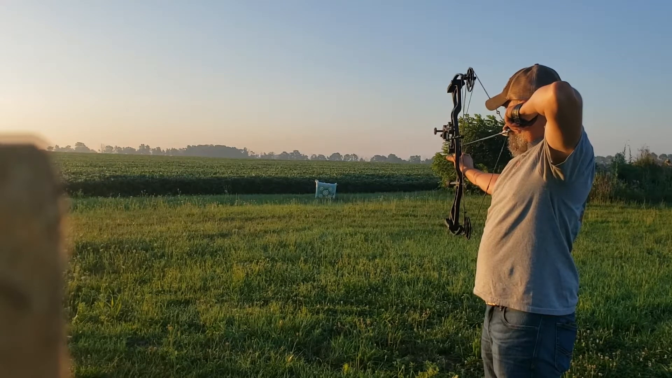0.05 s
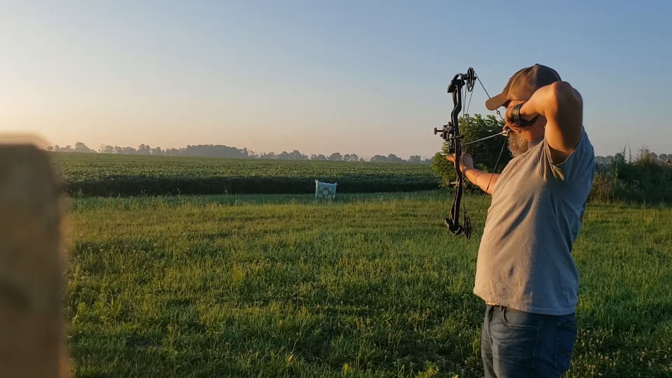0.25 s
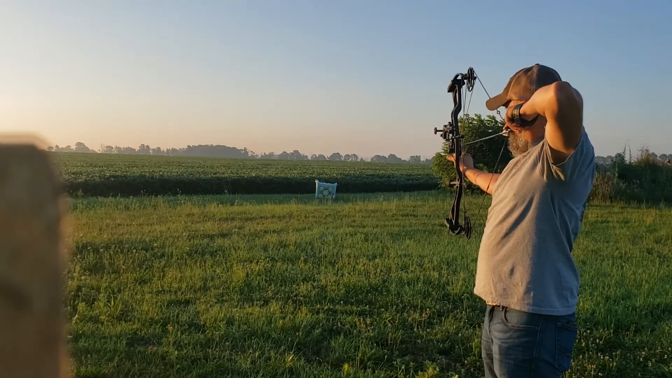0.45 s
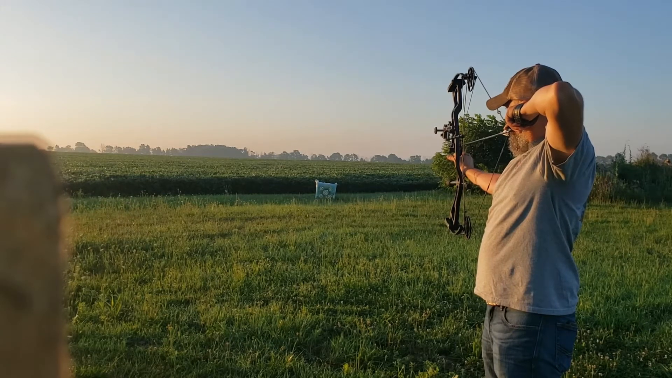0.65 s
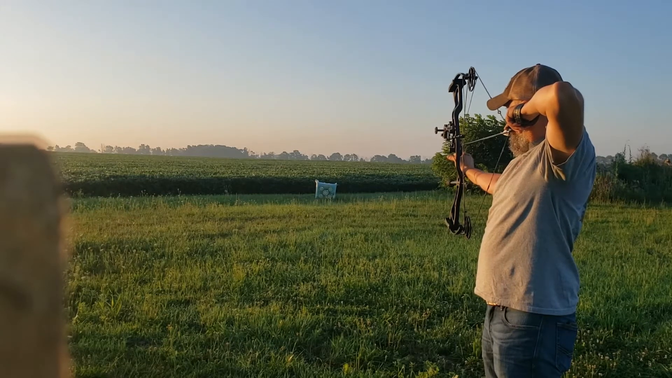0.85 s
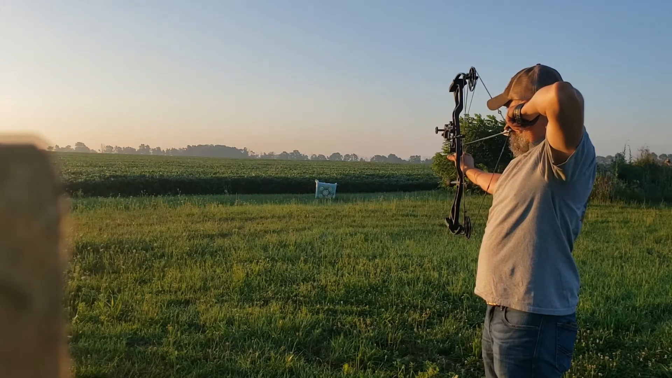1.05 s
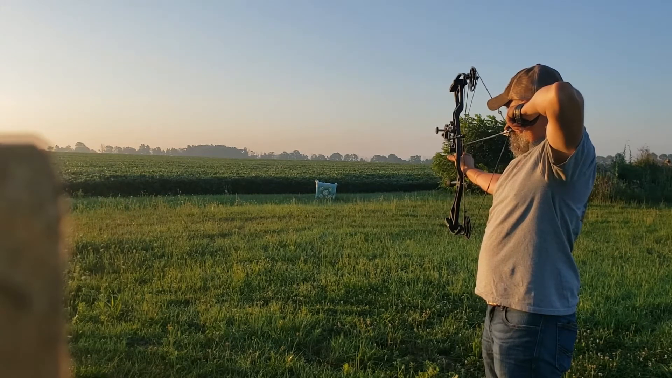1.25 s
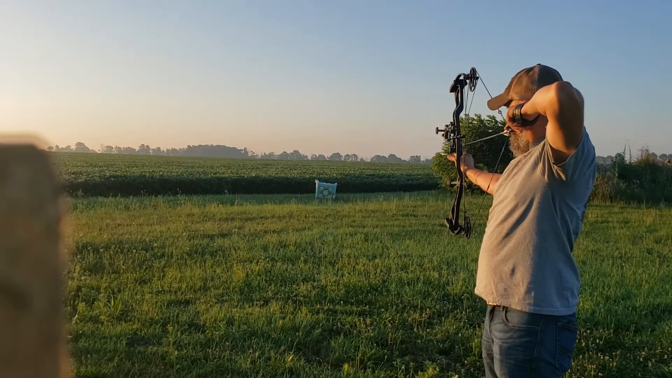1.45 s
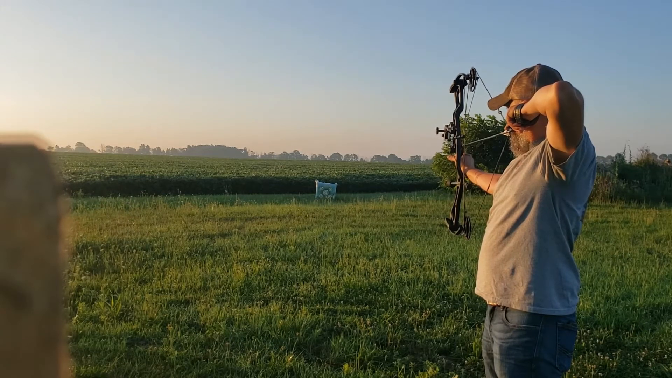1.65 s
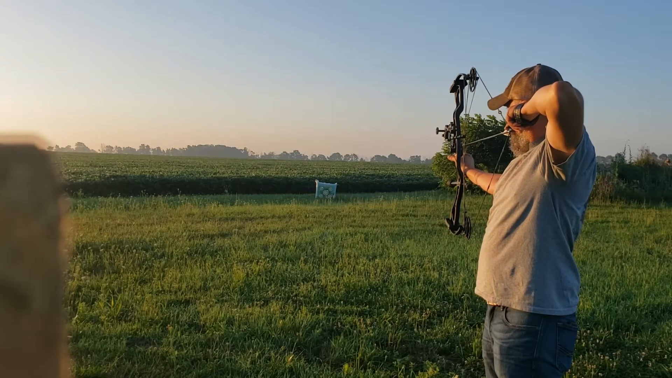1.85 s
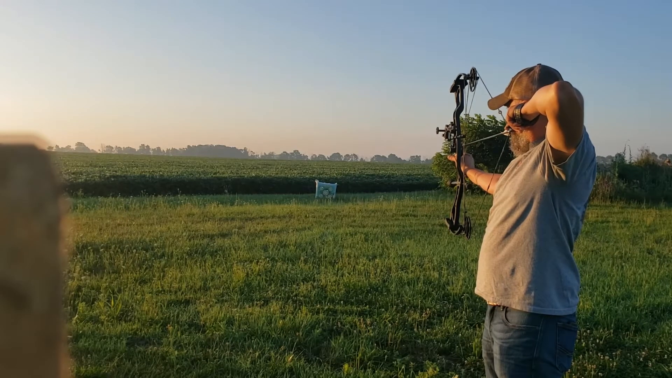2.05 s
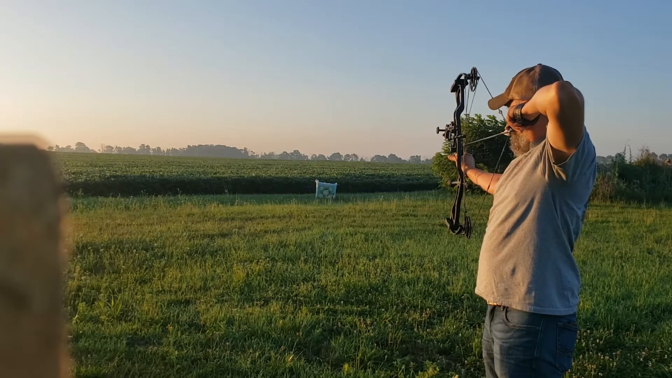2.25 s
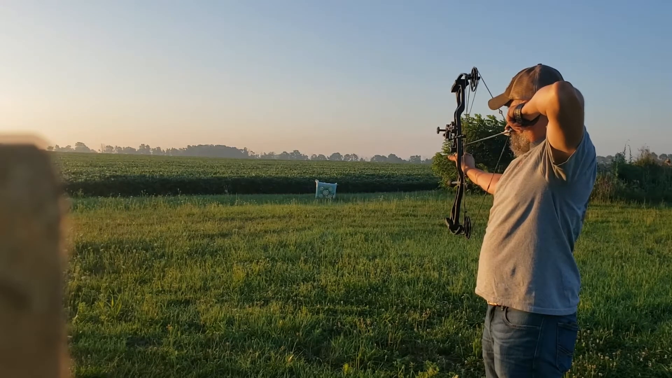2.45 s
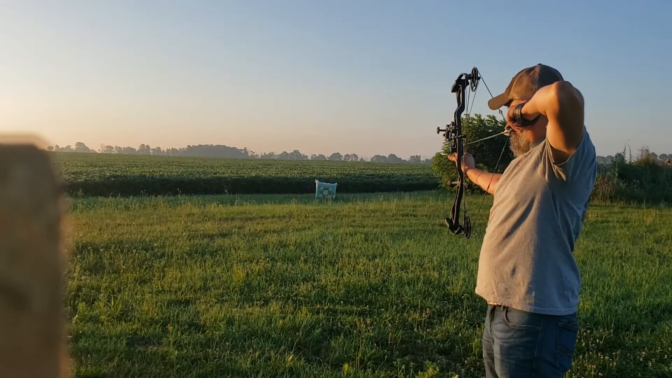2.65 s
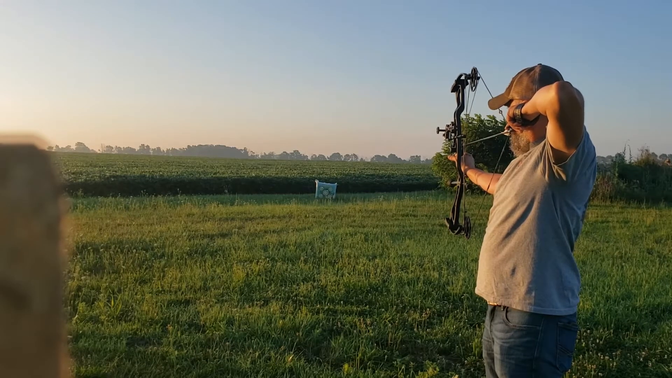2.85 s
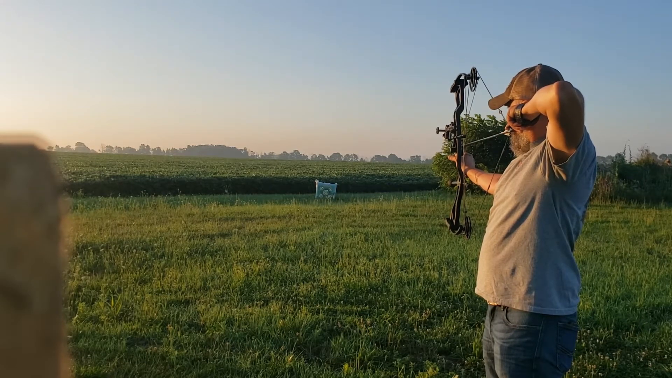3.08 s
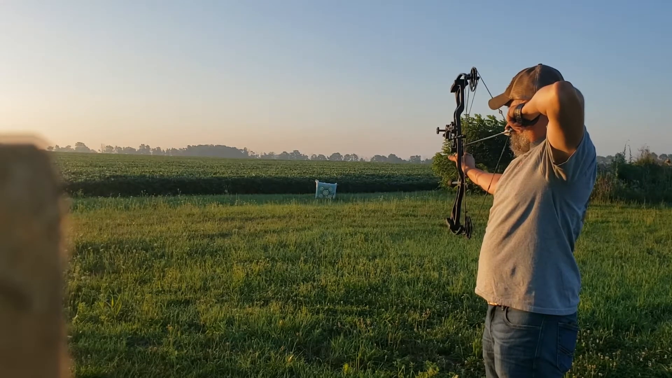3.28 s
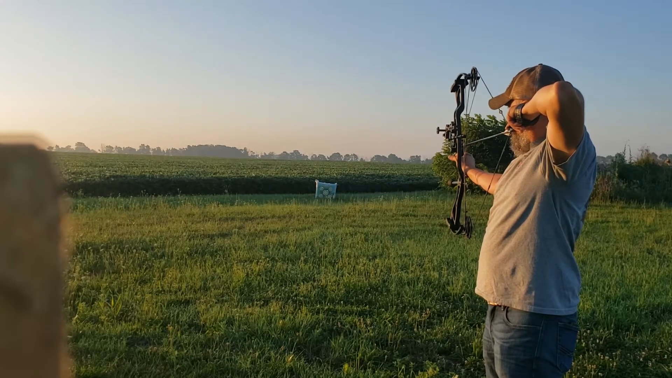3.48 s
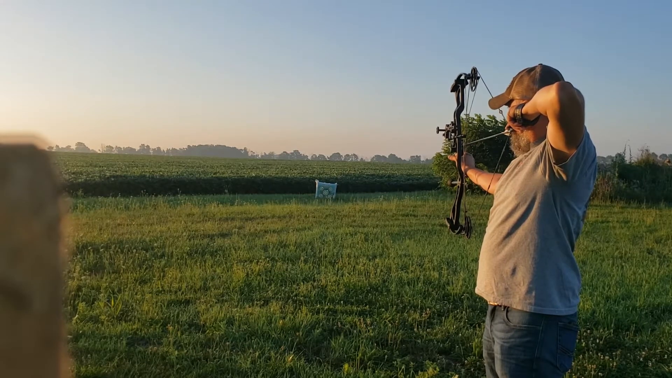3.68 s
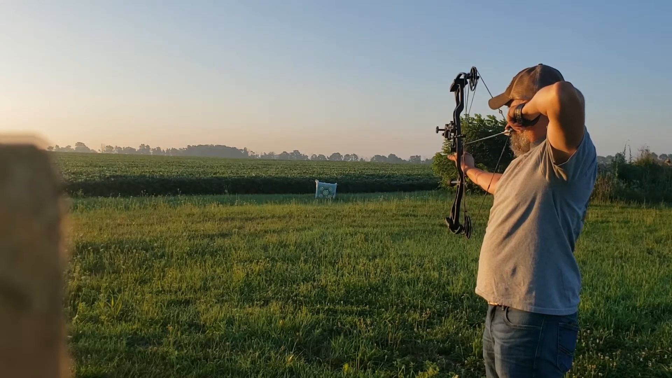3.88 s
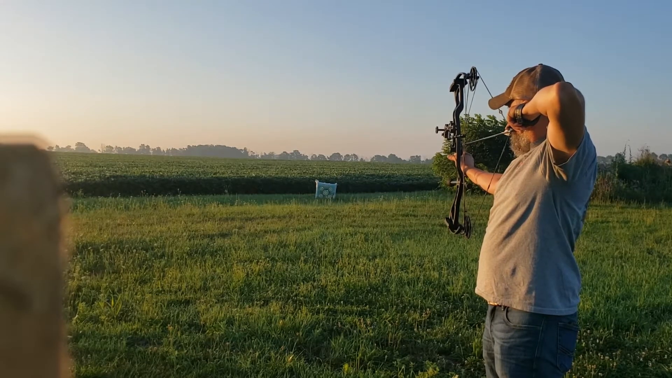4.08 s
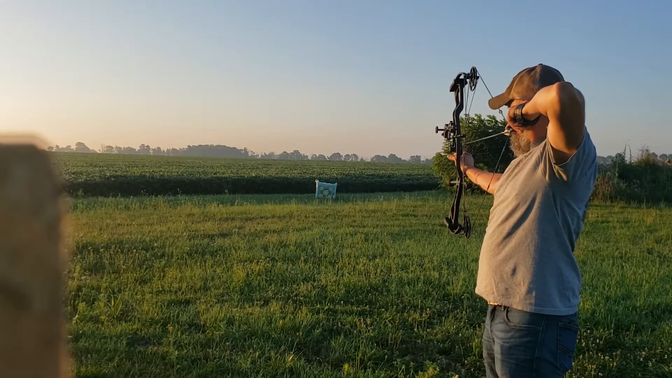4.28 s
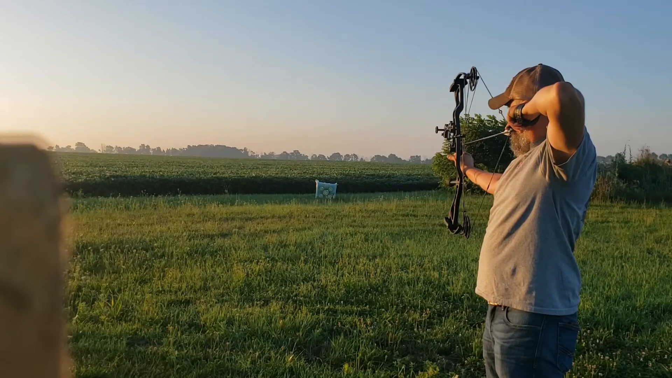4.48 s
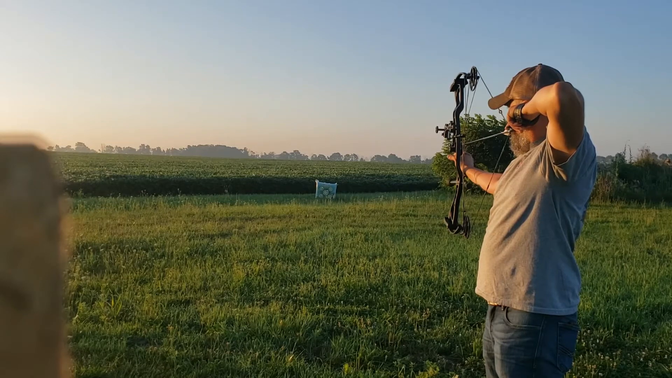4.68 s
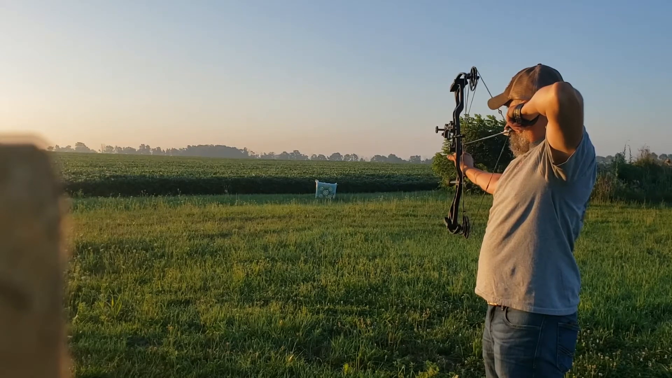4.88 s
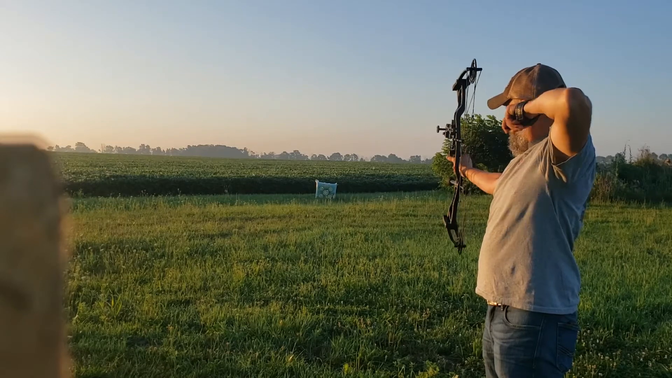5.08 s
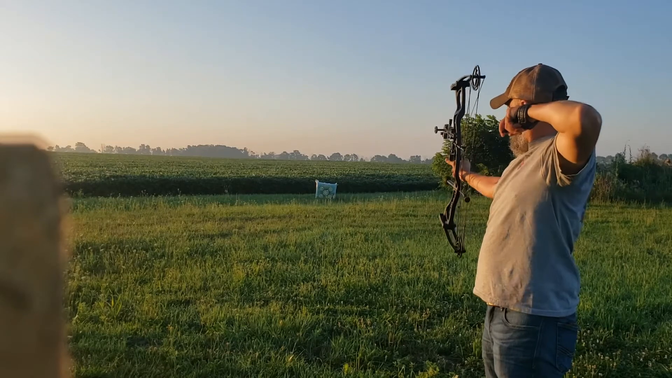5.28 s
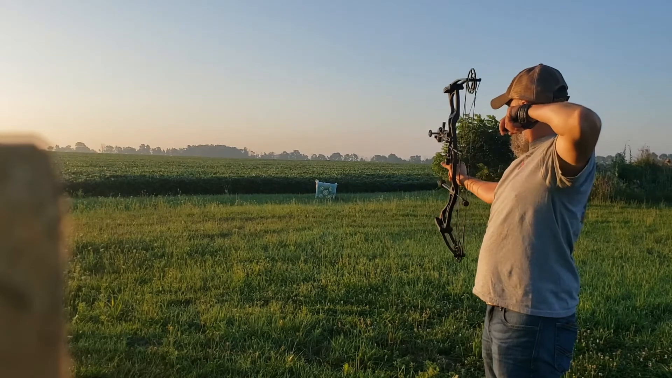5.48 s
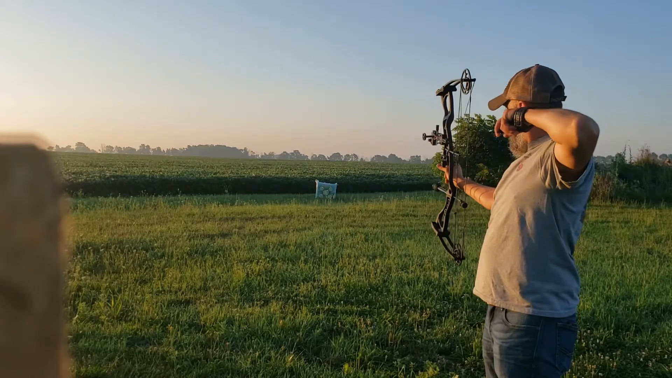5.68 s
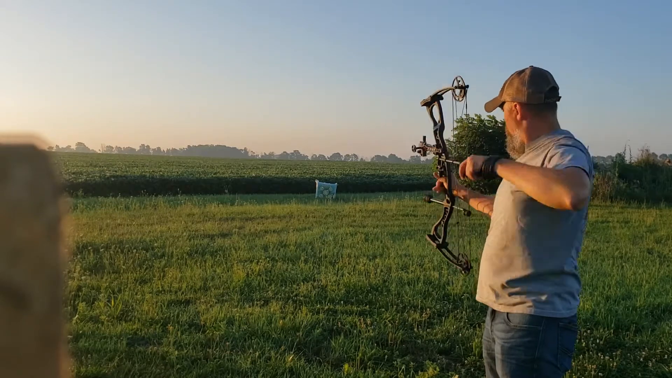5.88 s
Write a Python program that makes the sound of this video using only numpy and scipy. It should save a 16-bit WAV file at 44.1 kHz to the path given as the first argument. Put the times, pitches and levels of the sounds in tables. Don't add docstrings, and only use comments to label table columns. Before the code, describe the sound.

Faint low rumble, soft wind puffs and distant small birds, mostly on the right, fill five quiet seconds in an open field. Then, close to the stereo microphone, a release clicks, the string rushes and cables slap with a short metallic ring. A third of a second later the arrow cracks into a foam block with a short low thud, and the field scatters the echo.

```python
import sys
import numpy as np
from scipy import signal
from scipy.fft import rfft, irfft, next_fast_len
from scipy.io import wavfile
from scipy.ndimage import uniform_filter1d, map_coordinates

SR = 44100
rng = np.random.default_rng(int(sys.argv[2]) if len(sys.argv) > 2 else 0)


def pcm_store(signal):
    levels = np.round(np.clip(np.atleast_2d(signal), -1, 1) * 32767)
    wavfile.write(sys.argv[1], SR, levels.astype(np.int16).T)


def elevation(decibels):
    levels = np.asarray(decibels, float)
    return 10 ** (levels / 20)


N = 261842

# start_s, level_db
RUMBLE_LEVEL = [(0, -56.5), (.49, -57.5), (.72, -51), (.87, -58), (1.03, -47), (1.16, -56), (1.65, -59.5),
                (2.0, -55), (2.6, -58.5), (3.19, -58.5), (3.5, -55), (4.0, -62), (4.32, -57.5), (4.66, -64),
                (4.82, -53.5), (5.24, -51.5), (5.8, -56.5), (5.94, -56)]
# pitch_hz, density_db_per_hz
RUMBLE_COLOUR = [(12, -47.5), (20, -25.5), (43, -5.5), (65, -1), (109, -9.5), (135, -14.5), (189, -19),
                 (215, -20), (282, -25.5), (600, -51.5), (780, -87.5), (1320, -120)]
AIR_COLOUR = [(180, -23.5), (300, -2.5), (433, -11), (678, -15.5), (1210, -19), (2100, -13), (2980, -21.5),
              (4830, -20), (6000, -23), (7200, -32.5), (8360, -34.5), (10000, -28.5), (12100, -21.5),
              (15200, -20), (16000, -35.5)]
AIR_DB = -79
# pitch_hz, likeness
PORT_LIKENESS = [(60, 1), (130, 0.97), (290, 0.71), (640, 0.081), (1410, -0.11), (3100, -0.11),
                 (6820, -0.29), (15000, 0.23)]
# pitch_hz, left_minus_right_db
PORT_BALANCE = [(60, -2), (130, 1), (290, -0.5), (640, 0.5), (1410, -4.5), (3100, -8.5), (6820, -2),
                (15000, -1)]
# left_db, right_db
BREEZE_DB = (-17.5, -8)
# middle_s, length_s, level_db
PUFFS_LEFT = [(4.9, 0.11, -44)]
PUFFS_RIGHT = [(0.771, 0.07, -40.5), (.89, 0.047, -47.5), (1.059, 0.16, -44), (1.23, 0.051, -47.5),
               (1.97, 0.084, -48.5), (4.72, 0.14, -52), (5.65, 0.05, -42.5)]

# start_s, level_db
HAZE_LEVEL = [(0, -95), (.97, -92.5), (1.27, -86.5), (2.8, -85), (3.1, -100), (3.5, -98), (3.62, -84),
              (3.79, -99), (4.97, -92)]
# pitch_hz, density_db_per_hz
HAZE_COLOUR = [(5600, -38.5), (6300, -6), (7000, -3.5), (7700, -3.5), (8000, -40.5)]
# pitch_hz, left_minus_right_db
BIRD_SIDE = [(3300, -2.5), (3700, -14.5), (6000, -19), (9000, -33)]
GLIDES = dict(level=(1, 1), arch=(.83, .83), bow=(.94, .94), lift=(.86, .99), rise=(.87, 1.08),
          climb=(.94, 1.04), fall=(1.14, .86), plunge=(1.28, .79), dip=(1.58, 1.25), settle=(1.1, 1.03),
          swoop=(1.25, .94), hook=(1.035, 1.01), sag=(1.025, .99), crest=(.945, .985), skid=(1.32, .9),
          drop=(1.12, .89))
VAULT = (.76, .95)
# start_s, length_s, middle_hz, level_db, glide
CHIPS = [(.018, 0.0087, 8300, -66.5, "plunge"), (.023, 0.011, 7430, -62, "fall"),
         (.023, .005, 4940, -71, "fall"), (1.334, 0.014, 7870, -66, "hook"),
         (1.332, .008, 9300, -75, "plunge"), (1.333, 0.005, 10300, -72, "hook"),
         (3.614, 0.01, 9660, -70, "plunge"), (3.628, 0.0092, 10600, -68, "hook"),
         (3.622, 0.011, 7840, -72.5, "fall"), (4.628, 0.0056, 7000, -78, "rise"),
         (4.797, 0.0064, 6960, -74, "rise"), (4.966, .006, 7000, -80, "rise")]
# start_s, length_s, middle_hz, level_db, glide
WARBLE = [
    (2.775, .11, 6370, -55.5, "vault"),
    (2.786, 0.11, 5350, -63.5, "lift"),
    (2.874, 0.064, 5050, -57.5, "drop"),
]
BUZZ = [
    (2.99, .67, 5284, -68, "level"),
]
# delay_s, length_s, middle_hz, level_db, glide
ARCH = [(-.006, .046, 4560, -5, "arch"), (.027, 0.016, 4050, -1, "drop"), (.055, 0.012, 5440, 3.5, "sag"),
        (.06, .016, 5000, 0, "drop"), (.068, 0.015, 4690, 0, "sag")]
DIVE = [(0, .03, 5200, -0.5, "rise"), (.016, 0.024, 5340, 2.5, "level"), (.028, 0.027, 3940, 2.5, "skid"),
        (.035, 0.069, 2960, -14, "dip"), (.08, .02, 3550, -12, "rise"), (.094, 0.022, 3880, 7, "level")]
FLICK = [(.004, 0.039, 5370, 0.5, "crest"), (.046, .02, 4940, -3.5, "skid"),
         (.066, .045, 7100, -23, "climb"), (.115, .04, 4243, -6, "crest")]
TENT = [(.055, .033, 4400, -2, "rise"), (.076, 0.016, 4800, 2, "level"), (.087, .011, 4380, -6, "drop")]
# start_s, level_db
ARCH_TIMES = [(1.276, -76), (1.439, -73.5)]
DIVE_TIMES = [(1.655, -68), (1.869, -71)]
FLICK_TIMES = [(2.144, -60.5), (2.429, -57.5)]
TENT_TIMES = [(3.171, -61.5), (3.444, -60)]
# start_s, length_s, middle_hz, level_db, glide
SINGLES = [(.909, 0.043, 4690, -71.5, "level"), (1.045, 0.14, 5800, -86, "swoop"),
           (1.384, 0.023, 3910, -73, "climb"), (1.832, 0.039, 7080, -70.5, "level"),
           (1.93, 0.029, 5400, -70, "level"), (1.984, 0.021, 4970, -63, "level"),
           (2.092, 0.06, 5570, -81, "hook"), (2.146, 0.05, 4320, -65.5, "settle"),
           (2.45, 0.047, 4320, -66.5, "settle"), (2.518, 0.079, 5330, -72, "level"),
           (2.594, 0.042, 4320, -73, "hook"), (2.742, 0.17, 7900, -77, "level"),
           (2.751, 0.12, 7350, -71, "level"), (3.0, 0.56, 5280, -71, "level"),
           (3.0, 0.11, 5280, -69, "level"), (3.085, 0.031, 4000, -72.5, "fall"),
           (3.172, 0.032, 4180, -71, "climb"), (3.2, 0.048, 4430, -67, "level"),
           (3.442, 0.031, 4480, -70, "rise"), (3.48, 0.11, 4800, -76, "level"),
           (3.641, 0.058, 4870, -63.5, "sag"), (3.7, 0.11, 4860, -74, "level"),
           (2.965, 0.032, 2080, -77, "level"), (3.093, 0.044, 2060, -83, "level"),
           (3.29, .04, 2210, -86, "level"), (3.31, .03, 4100, -76, "rise"),
           (3.365, 0.027, 4120, -73, "fall"), (3.386, 0.031, 4850, -64.5, "level")]
# start_s, length_s, level_db
SEEPS = [(.27, 0.047, -84), (1.286, .05, -88), (3.498, .1, -85), (4.203, 0.042, -82), (4.857, .05, -84)]
SEEP_HZ = 8060
# delay_s, length_s, middle_hz, level_db, glide
WHISTLE = [(0, 0.018, 5270, -8.5, "hook"), (.006, .062, 4920, 0, "hook"), (.075, .045, 4980, -17, "hook")]
TRILL = [(-.01, 0.14, 3155, -3, "level"), (0, 0.17, 2610, -1.3, "level")]
BURR = [(0, 0.046, 6250, 0.5, "crest"), (0, 0.054, 5850, -5.5, "level")]
# start_s, level_db
WHISTLE_TIMES = [(3.963, -57.5), (4.279, -57.5)]
TRILL_TIMES = [(3.742, -72.5), (4.057, -71)]
BURR_TIMES = [(3.32, -59.5), (3.599, -63.5)]
BEAT_S = .1692
TICK_S, TICK_LENGTH_S, TICK_HZ, TICK_DB = 4.365, 0.018, 3090, -65.5
PIP_S, PIP_LENGTH_S, PIP_HZ, PIP_DB = 4.474, 0.04, 6070, -57
SHIMMER_PER_S = 1100

# start_s, peak_db
CREAKS = [
    (4.655, -58),
]
# start_s, left_db, right_db, rise_s, t60_s
RELEASE = [
    (5.0362, -37, -32, 0.00061, 0.041),
    (5.040, -28.5, -20.5, 0.00024, 0.035),
    (5.042, -27, -39, 0.0026, 0.17),
]
# start_s, left_db, right_db, rise_s, t60_s
SLAPS = [
    (5.054, -34, -29, 0.0012, 0.031),
    (5.059, -24, -15.5, 0.0017, 0.1),
    (5.0638, -16.5, -11.5, 0.00023, 0.019),
    (5.071, -26.5, -10, 0.00033, 0.014),
    (5.0762, -28, -15.5, .0005, 0.028),
    (5.089, -21.5, -26.5, .002, 0.044),
    (5.066, -22.5, -26.5, 0.0028, 0.14),
    (5.07, -36, -30.5, 0.0092, 0.32),
]
# pitch_hz, level_db
SLAP_LEFT = [(200, -8), (800, 1), (1600, 12), (2500, -10.5), (5000, -10), (8500, -21), (10000, -20.5),
             (12000, -18), (15000, -8)]
SLAP_RIGHT = [(200, -12.5), (800, 3), (1600, -4.5), (2500, -6.5), (5000, -3), (7500, -3), (9500, -13),
              (12000, -3.5), (15000, -8.5)]
# pitch_hz, width_hz, level_db
FRAME = [(214, 120, -2), (415, 30, 4), (754, 19, -10.5), (945, 170, -3.5), (1125, 21, -5.5),
         (1260, 12, -10.5), (1454, 26, 5.5), (2080, 26, -11.5)]
RISER_LAG_S = .0012
STOP_S, REBOUND_S, REBOUND_DB = 5.0652, 5.0868, -6.5
# pitch_hz, level_db, t60_s
LIMBS = [(228, -6.5, .12), (384, -6, .1), (425, -9.5, 0.46), (499, -18, 0.2), (575, -15, .07),
         (686, -14, .08), (759, -13.5, 0.22), (936, -3.5, .04), (981, -11, 0.14), (1133, -13.5, 0.14),
         (1446, 5, .035), (1474, -8, 0.18), (1560, -5.5, 0.07), (1673, -12.5, .06), (2090, -16.5, 0.11)]
# start_s, left_db, right_db, rise_s, t60_s
SNAP = [
    (5.0637, -17.5, -0.5, .0003, 0.0074),
]
# pitch_hz, width_hz, level_db
GUARD = [(10900, 1300, 2.5), (15400, 2500, -2)]
# start_s, left_db, right_db, rise_s, t60_s
HEDGE_SLAP = [
    (5.286, -50, -50, .004, .1),
    (5.31, -53, -53, .004, .1),
]
# pitch_hz, width_hz, level_db
HEDGE_TONE = [(1050, 800, 0.3)]

# delay_s, level_db, swell_db_per_s, fade_db_per_s
BELTS = [
    (.006, -57.5, 100, 298.5),
    (.098, -49, 51.5, 212),
    (.2115, -57.5, 900, 149),
    (.3, -75.5, 100, 55),
]
# pitch_hz, density_db_per_hz
SCATTER_BANDS = [
    [(180, -26.5), (280, 0.5), (600, -8), (1000, -3.5), (1490, -11), (2000, -14), (2600, -35.5),
     (4400, -120)],
    [(1180, -37), (2000, -6), (2980, 2.5), (3730, 0.5), (6090, -12.5), (6880, -10.5), (8500, -26),
     (11000, -54.5), (18700, -120)],
    [(5290, -38), (9000, -8.5), (9390, -15.5), (11700, -1), (15700, -15)],
]
# pitch_hz, left_minus_right_db
ECHO_SHADE = [(60, -3.5), (150, -9), (380, -5), (950, -5.5), (2380, 2.5), (5980, -15.5), (15000, -3)]
LOW_DB, LOW_LAG_S, LOW_FADE = -5.5, .012, 1.2
HIGH_DB, AIR_LOSS_DB_PER_S, GRAIN_DB = -12.5, 73, 3.5

HIT_S, LEFT_LAG_S = 5.37265, .00013
# delay_s, force
BLOWS = [
    (0, -.3),
    (.00007, -.38),
    (.0003, -.65),
    (.0004, 1.1),
    (.0015, .3),
    (.0019, -.2),
    (.0024, .25),
]
FOAM_HZ = 5500
# pitch_hz, width_hz, level_db
BLOCK = [(312, 21, 1.5), (1070, 160, -2.5), (2500, 82, -1.5), (3520, 58, -3), (4910, 50, 1.5),
         (7150, 110, -13), (11100, 120, 2), (12500, 100, -17)]
# delay_s, pitch_hz, level_db, length_s
THUD = [
    (0.0108, 148, -19.5, .0095),
    (0.0185, 79, -32, 0.0165),
    (.001, 125, -30, .0095),
    (.0003, 1050, -27, .0042),
    (.0012, 2740, -25, .005),
    (.0012, 3520, -28, .003),
    (.0003, 2150, -25, .003),
    (.0025, 2780, -30, .005),
]
# pitch_hz, level_db
CRACK_TONE = [(330, 0.1), (600, -13), (900, 1.5), (7000, 1), (9200, -9.5), (11200, -4), (13000, -4.5)]
# pitch_hz, left_minus_right_db
SHADE = [(60, -1.5), (380, -1.5), (1050, -1.5), (2740, -9), (3900, -16.5), (6000, -17), (11200, -16.5),
         (14000, -5)]
# delay_s, level_db
WALL = [
    (.041, -31),
    (.085, -29),
    (.131, -28),
    (.2125, -24),
    (.247, -26),
]
TOP_HZ = 15800


def unit(x):
    return x / np.sqrt(np.mean(x ** 2) + 1e-20)


def along(points, hz):
    f, v = np.transpose(points)
    return np.interp(np.log(hz + 1), np.log(f + 1), v)


def add(track, s, x):
    part = track[..., round(s * SR):][..., :x.shape[-1]]
    part += x[..., :part.shape[-1]]


def wobble(rate):
    knots = rng.standard_normal(int(N * rate / SR) + 4)
    return map_coordinates(knots, [np.arange(N) * rate / SR])


def filtered(x, response):
    m = next_fast_len(x.shape[-1] + 8192)
    spectrum = rfft(x, m) * response(np.fft.rfftfreq(m, 1 / SR))
    return irfft(spectrum, m)[..., :x.shape[-1]]


def noise(colour, length=N):
    return unit(filtered(rng.standard_normal((2, length)), lambda hz: elevation(along(colour, hz))))


def sided(x, balance):
    return filtered(x, lambda hz: elevation(np.outer([.5, -.5], along(balance, hz))))


def resonances(peaks, widen):
    def response(f):
        total = 0
        for k, (centre, width, db) in enumerate(peaks):
            loss = 1j * f * widen * width
            total = total + (-1) ** k * elevation(db) * loss / (centre * centre - f * f + loss)
        return total
    return response


def rush(colour):
    def mid_side(hz):
        turn = np.arccos(np.clip(along(PORT_LIKENESS, hz), -1, 1)) / 2
        return elevation(along(colour, hz)) * [np.cos(turn), np.sin(turn)]
    mid, side = filtered(rng.standard_normal((2, N)), mid_side)
    return unit(sided(np.array([mid + side, mid - side]), PORT_BALANCE))


def ambience():
    t = np.arange(N) / SR
    level = elevation(np.interp(t, *np.transpose(RUMBLE_LEVEL)))
    rumble = unit(elevation(2.69 * wobble(12)) * rush(RUMBLE_COLOUR)) * level
    breeze = unit(filtered(rng.standard_normal((2, N)),
                           lambda hz: elevation(along(RUMBLE_COLOUR, hz)) / (1 + (hz / 110) ** 4)))
    gusts = np.outer(elevation(np.array(BREEZE_DB)), level)
    for port, puffs in enumerate((PUFFS_LEFT, PUFFS_RIGHT)):
        for s, length, db in puffs:
            gusts[port] += elevation(db) * np.exp(-(2 * (t - s) / length) ** 2)
    air = elevation(AIR_DB + 3.5 + 0.36 * wobble(4.1)) * rush(AIR_COLOUR)
    return rumble + breeze * gusts + air


def sung(syllable, times):
    return [(s + delay, length, hz, db + part_db, glide)
            for s, db in times
            for delay, length, hz, part_db, glide in syllable]


def notes(rows, pulse_hz=0, sweep_hz=0, rough=0.29, soft=0.39):
    out = np.zeros(N)
    for s, length, middle, db, glide in rows:
        start, end = middle * np.array(GLIDES.get(glide, VAULT))
        u = np.linspace(0, 1, round(length * SR))
        shake = uniform_filter1d(rng.standard_normal((2, len(u))), size=160, axis=1) * np.sqrt(160)
        beat = (u * length * pulse_hz) % 1
        hz = 2 * start * (u - .5) * (u - 1) + 4 * middle * u * (1 - u) + 2 * end * u * (u - .5)
        hz = hz + sweep_hz * (beat - .5)
        gate = np.sin(np.pi * beat) ** 3 if pulse_hz else 1
        swell = np.sin(np.pi * u) ** soft * gate * (1 + rough * shake[0])
        phase = 2 * np.pi * np.cumsum(hz) / SR + rough * shake[1]
        add(out, s, elevation(db) * swell * np.sin(phase))
    return out


def hedge(x, wet_db, t60, bounce_s, bounce_db, steady=0.91):
    t = np.arange(SR // 2) / SR
    smear = elevation(-60 * t / t60) * (1 - np.exp(-t / .015))
    bounce = elevation(bounce_db) * np.exp(-((t - bounce_s) / 0.035) ** 2)
    tail = (smear + bounce) * rng.standard_normal((2, len(t)))
    tail = tail / np.linalg.norm(tail[0])
    flutter = unit(steady + np.array([wobble(SHIMMER_PER_S), wobble(SHIMMER_PER_S)]))
    return x + elevation(wet_db) * flutter * signal.fftconvolve(x[None], tail, axes=1)[:, :N]


def insects():
    s, db = np.transpose(HAZE_LEVEL)
    level_db = np.interp(np.arange(N) / SR, s, db, right=-120) + 2.0 + 1.2 * wobble(20)
    return elevation(level_db) * noise(HAZE_COLOUR)


def birds():
    song = sung(ARCH, ARCH_TIMES) + sung(DIVE, DIVE_TIMES)
    song += sung(FLICK, FLICK_TIMES) + sung(TENT, TENT_TIMES) + SINGLES
    song += [(s, length, SEEP_HZ, db, "level") for s, length, db in SEEPS]
    first = notes(song, rough=.3)
    first += notes(WARBLE, pulse_hz=91, sweep_hz=1500, rough=.2)
    first += notes(sung(BURR, BURR_TIMES), pulse_hz=220, sweep_hz=600, rough=.4)
    first += notes(BUZZ, pulse_hz=440, sweep_hz=600, rough=.9)
    ticks = [(TICK_S + k * BEAT_S, TICK_LENGTH_S, TICK_HZ, TICK_DB, "hook") for k in range(6)]
    pips = [(PIP_S + k * BEAT_S, PIP_LENGTH_S, PIP_HZ, PIP_DB, "level") for k in range(4)]
    second = notes(pips, rough=.2, soft=.9)
    whistles = notes(sung(WHISTLE, WHISTLE_TIMES), rough=.2, soft=1)
    low = notes(ticks, rough=.25, soft=1.5)
    low += notes(sung(TRILL, TRILL_TIMES), pulse_hz=51, sweep_hz=220, rough=.2)
    chips = notes(CHIPS, rough=1.1)
    heard = hedge(first, wet_db=-0.8, t60=.9, bounce_s=0.031, bounce_db=-12, steady=1.2)
    heard += hedge(second, wet_db=-12.0, t60=0.5, bounce_s=0.082, bounce_db=-5.5, steady=3)
    heard += hedge(whistles, wet_db=-7, t60=.9, bounce_s=0.096, bounce_db=-3, steady=1.9)
    heard += hedge(low, wet_db=-10.5, t60=.2, bounce_s=0.03, bounce_db=-8.5, steady=1.7)
    heard += hedge(chips, wet_db=-4, t60=.3, bounce_s=.04, bounce_db=-3)
    heard += insects()
    return filtered(heard, lambda hz: elevation(np.outer([1, 0], along(BIRD_SIDE, hz))))


def bursts(rows):
    out, t = np.zeros((2, N)), np.arange(SR // 3) / SR
    for s, left_db, right_db, rise, t60 in rows:
        shape = elevation(-60 * t / t60) * (1 - np.exp(-t / rise))
        add(out, s, elevation([[left_db], [right_db]]) * shape * rng.standard_normal((2, len(t))))
    return out


def scatter():
    t = np.arange(round(.57 * SR)) / SR

    def level(u, faster=1):
        power = 0
        for s, db, swell, fade in BELTS:
            power = power + elevation(2 * (db + np.minimum(swell * (u - s), faster * fade * (s - u))))
        return np.sqrt(power)

    low = elevation(LOW_DB) * level(t - LOW_LAG_S, LOW_FADE)
    high = elevation(HIGH_DB - AIR_LOSS_DB_PER_S * t) * level(t)
    tail = np.zeros((2, len(t)))
    for colour, gain in zip(SCATTER_BANDS, (low, level(t), high)):
        grain = np.array([wobble(260), wobble(259.7)])[:, :len(t)]
        tail += noise(colour, len(t)) * gain * elevation(GRAIN_DB * grain)
    return sided(tail * np.clip(t / 0.0039, 0, 1), ECHO_SHADE)


def echoed(x, wet_db):
    tail = scatter()
    return elevation(wet_db) * signal.fftconvolve(x[None], tail / np.linalg.norm(tail), axes=1)[:, :N]


def slap_colour(hz):
    return elevation([along(SLAP_LEFT, hz), along(SLAP_RIGHT, hz)]) * hz / (hz + 150)


def thin_colour(hz):
    return slap_colour(hz) * (0.11 + 1 / (1 + (5500 / (hz + 1)) ** 6))


def riser():
    knocks = bursts(SLAPS[:-1])
    shaken = np.roll(knocks + 0.9 * knocks[::-1], round(RISER_LAG_S * SR), axis=1)
    return elevation([[0.5], [0.1]]) * filtered(shaken, resonances(FRAME, widen=2.6))


def limbs():
    out, t = np.zeros((2, N)), np.arange(SR // 3) / SR
    for hz, db, t60 in LIMBS:
        skew = rng.uniform(.2, 0.57) * (hz / 1500) ** 2
        phase = np.array([[skew], [-skew]])
        decay_db = db - 60 * t / t60
        ring = np.sin(2 * np.pi * hz * t + 2 * np.pi * hz * phase)
        add(out, STOP_S, elevation(decay_db - 23.5) * (1 - np.exp(-t / 0.00082)) * ring)
        if hz > 960:
            again = np.sin(2 * np.pi * hz * (t + REBOUND_S - STOP_S) + 2 * np.pi * hz * phase)
            add(out, REBOUND_S, elevation(REBOUND_DB + decay_db - 27.0) * (1 - np.exp(-t / 0.0026)) * again)
    return out


def bow():
    creaks = [(s, db + 1.0, db + 8.5, .0001, .004) for s, db in CREAKS]
    thin = bursts(RELEASE) + bursts(creaks)
    contacts = filtered(bursts(SLAPS), slap_colour) + filtered(thin, thin_colour)
    answer = echoed(contacts.mean(0), wet_db=-21.5)
    answer += filtered(bursts(HEDGE_SLAP), resonances(HEDGE_TONE, widen=1))
    snap = filtered(bursts(SNAP), resonances(GUARD, widen=0.35))
    return contacts + riser() + limbs() + answer + snap


def crack():
    blows, deep, t = np.zeros(N), np.zeros(N), np.arange(SR // 4) / SR
    for s, force in BLOWS:
        (deep if s > .001 else blows)[round((HIT_S + s) * SR)] = force
    add(deep, HIT_S + 0.00077, 0.096 * elevation(-60 * t / 0.02) * rng.standard_normal(len(t)))
    add(blows, HIT_S - .005, 0.0009 * np.linspace(0, 1, 220) ** 2 * rng.standard_normal(220))
    blows += filtered(deep, lambda f: 1 / (1 + 1j * f / FOAM_HZ) ** 2)
    face = resonances(BLOCK, widen=9)

    def colour(f):
        direct = 0.88 / (1 + 1j * f / 7200) ** 3
        return (0.36 * face(f) + direct) * elevation(along(CRACK_TONE, f))
    return elevation(7.0) * filtered(blows, colour)


def thud():
    out, t = np.zeros(N), np.arange(SR // 4) / SR
    for s, hz, db, length in THUD:
        swell = np.sin(np.pi * np.clip(t / length, 0, 1) ** 0.474) * (1 - np.exp(-7 * hz * t))
        add(out, HIT_S + s, elevation(db) * swell * np.sin(2 * np.pi * hz * t))
    return out


def arrow():
    hit = crack()
    far = filtered(hit, lambda f: 1 / (1 + (2900 / (f + 1)) ** 6) / (1 + (f / 4600) ** 6))
    out = np.array([hit + thud()] * 2)
    for s, db in WALL:
        add(out, s, elevation(db) * far)
    out = sided(out, SHADE)
    out[0] = np.roll(out[0], round(LEFT_LAG_S * SR))
    add(out, HIT_S, elevation(1.5) * scatter())
    return out


def scene():
    return ambience() + birds() + bow() + arrow()


def band_limit(x):
    return signal.sosfilt(signal.butter(12, 16830, fs=SR, output="sos"), x)


def record(dry):
    mix = filtered(dry, lambda hz: elevation(-32 * np.clip((hz - TOP_HZ) / 250 + .5, 0, 1)))
    return band_limit(mix)


dry = scene()
out = record(dry)
pcm_store(out)
```